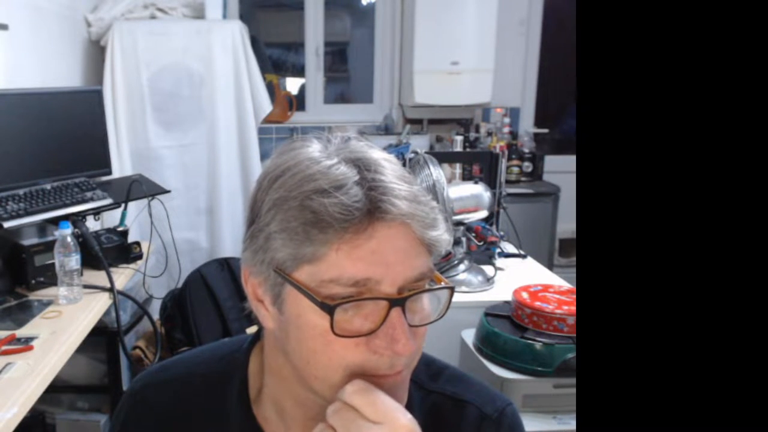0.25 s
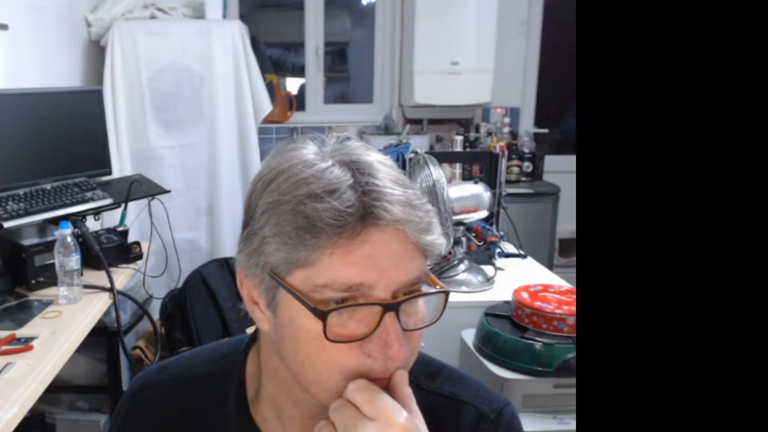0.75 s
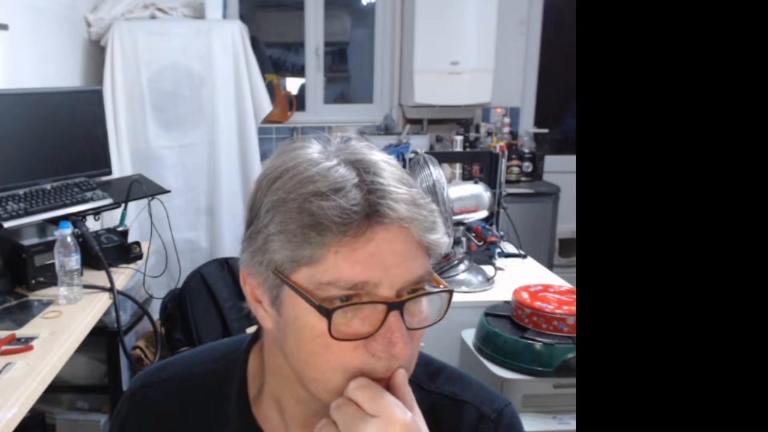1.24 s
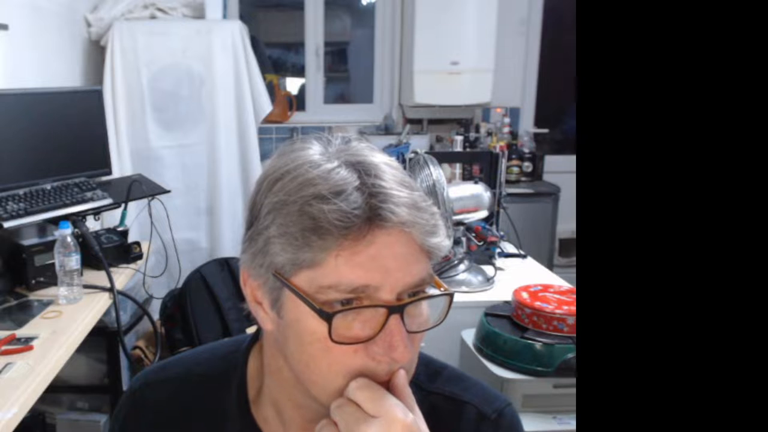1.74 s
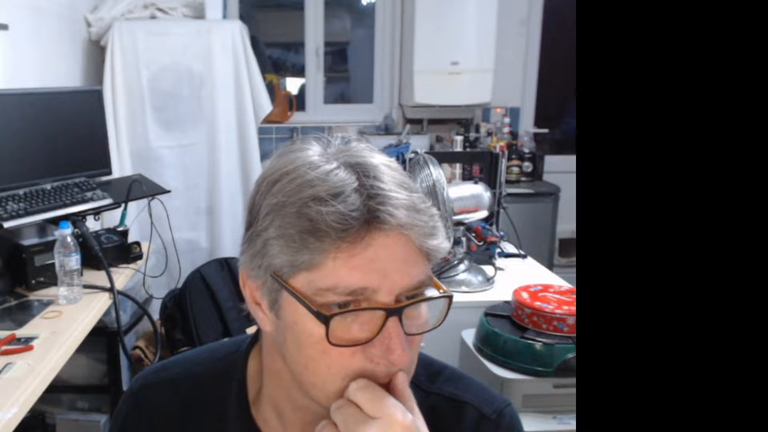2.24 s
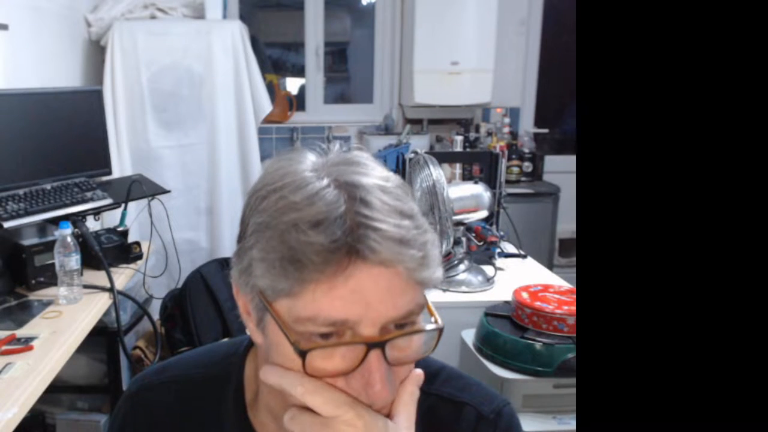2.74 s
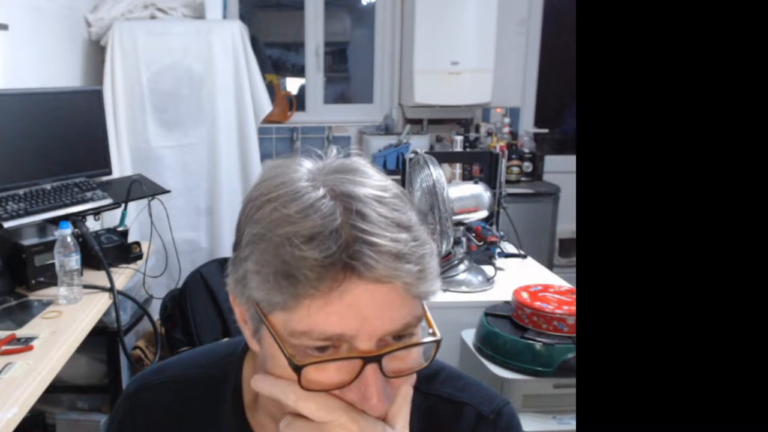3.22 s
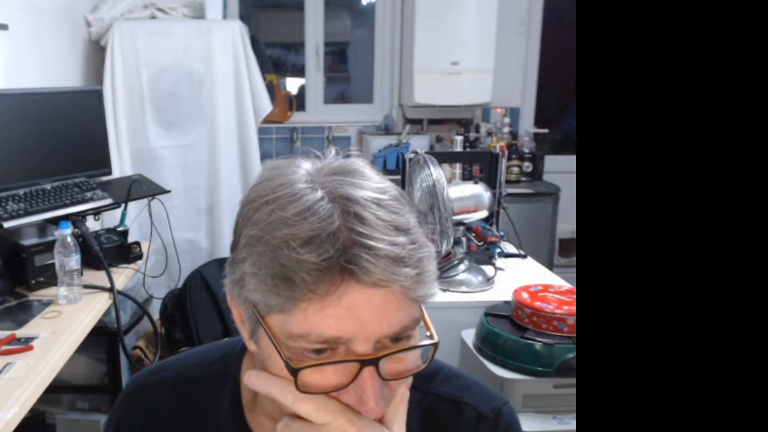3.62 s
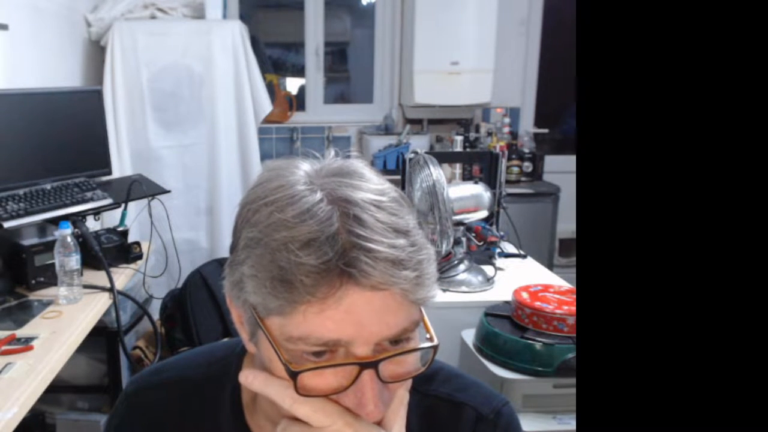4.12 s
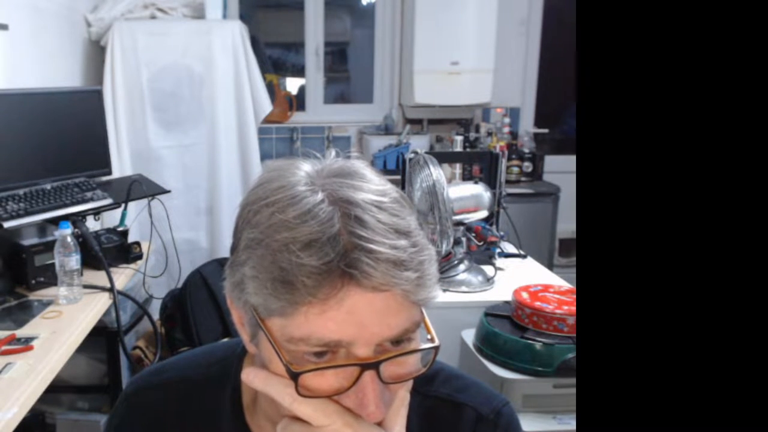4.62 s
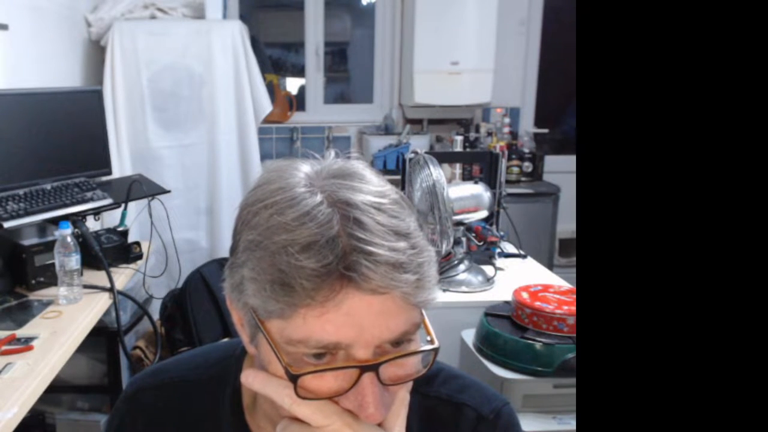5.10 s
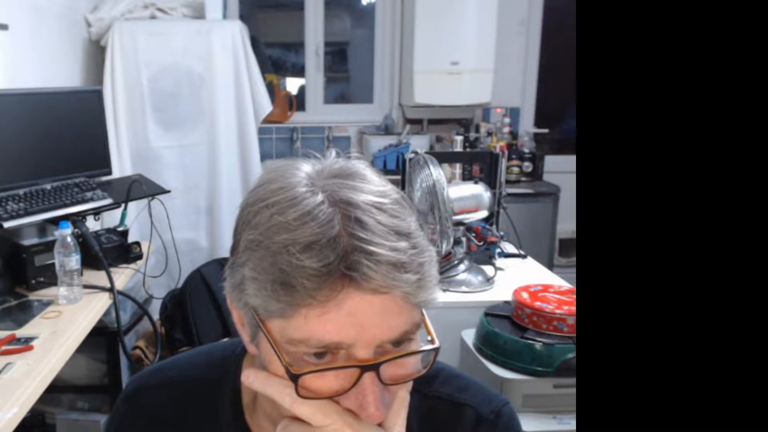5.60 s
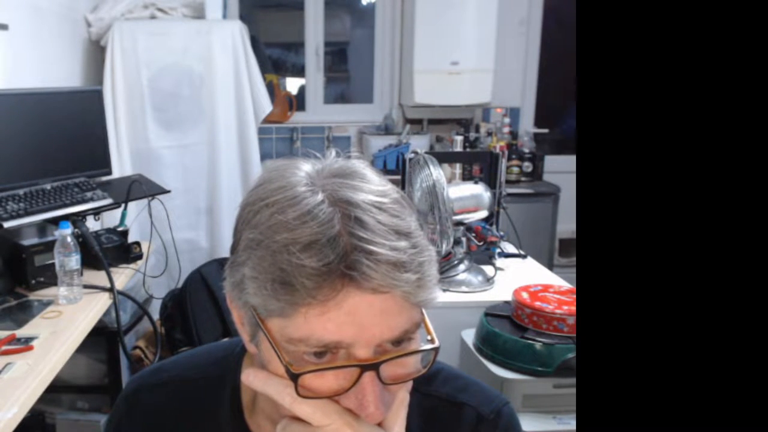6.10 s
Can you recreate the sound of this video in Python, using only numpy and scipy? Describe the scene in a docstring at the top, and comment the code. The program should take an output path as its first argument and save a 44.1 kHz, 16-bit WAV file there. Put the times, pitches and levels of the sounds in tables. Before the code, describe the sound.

In a small, dry workroom a desk fan runs throughout, a low beating throb under a rush of air, with two small fans whining beside it. A quick double knock hits the desk at the start; later come two tiny mouse clicks, a soft thud, one hard rattling knock, and two fainter clicks. A narrow-band desk microphone dips the fans after each hard knock.

```python
"""A desk fan runs throughout in a small workroom: a low beating blade throb and a rush of air through its guard.
Beside it two small fast fans, probably a computer's, whine in shaft-locked tones, each with one slow rise in speed.
Early on an object is knocked on the desk twice; a mouse then clicks, a soft and a hard knock follow,
and the mouse clicks again. Knocks are ringing modes plus rattle; clicks are a noise snap plus a ring.
A narrow-band desk microphone hears it all, and its limiter ducks the fans after each hard knock."""
import sys
import numpy as np
from scipy import signal
from scipy.fft import rfft, irfft
from scipy.io import wavfile
from scipy.ndimage import uniform_filter1d, minimum_filter1d

SR = 44100
rng = np.random.default_rng(int(sys.argv[2]) if len(sys.argv) > 2 else 0)


def file_out(sig):
    """Save sig as 16-bit WAV at sys.argv[1]."""
    # one column per channel
    cols = np.atleast_2d(sig).T
    # limit, then scale
    lim = np.clip(cols, -1, 1)
    pcm = np.round(lim * 32767).astype(np.int16)
    wavfile.write(sys.argv[1], SR, pcm)


N = 280035
ROOM_T60 = 0.21  # s, decay of the room behind knocks and clicks


def undb(db):
    """Decibels to gain."""
    return 10 ** (np.asarray(db) / 20)


def colour(x, points, lifts=()):
    """Shape a sound by a smooth spectrum plus bell-shaped resonances."""
    hz = np.maximum(np.fft.rfftfreq(len(x), 1 / SR), 1)
    point_hz, point_db = np.transpose(points)
    curve_db = np.interp(np.log(hz), np.log(point_hz), point_db)
    for centre_hz, width_hz, lift_db in lifts:
        curve_db = curve_db + lift_db / (1 + (2 * (hz - centre_hz) / width_hz) ** 4)
    return irfft(rfft(x) * undb(curve_db), len(x))


def butter(x, hz, kind, order):
    """Causal low-pass or high-pass, its corner held to a third of the sample rate at most."""
    sos = signal.butter(order, min(hz, SR / 3), kind, fs=SR, output="sos")
    return signal.sosfilt(sos, x)


def walk(rate_hz):
    """Slow random wander: levels held 1 / rate_hz seconds, slewed twice, scaled to a spread of 1."""
    hold = int(SR / rate_hz)
    steps = np.repeat(rng.standard_normal(N // hold + 1), hold)
    smooth = uniform_filter1d(uniform_filter1d(steps, hold), hold)[:N]
    return smooth / smooth.std()


def fade(t, t60):
    """Decay by 60 dB in t60 seconds."""
    return np.exp(-np.log(1000) * t / t60)


def tone(turns, db):
    """A sine of the given rms level that starts anywhere in its cycle."""
    return np.sqrt(2) * undb(db) * np.sin(2 * np.pi * (turns + rng.random()))


def add(out, start_s, sound, peak_db):
    """Place a sound at a time with a given peak level."""
    start = int(start_s * SR)
    levelled = undb(peak_db) * sound / np.abs(sound).max()
    out[start:start + len(sound)] += levelled[:N - start]


def desk_fan(swell_db=0.27, chop=0.027):
    """Blades throb; the air they drive rushes through the guard and pulses a little with each blade."""
    # two beating blade tones, then the motor's rotor and mains hum: pitch_hz [Hz], level_db [dB rms]
    hum_tones = [(38.1, -54), (40.9, -60.5), (97.8, -72), (100, -69)]
    # spectrum of the rush of air: pitch_hz [Hz], density_db [dB per Hz]
    air_spectrum = [(36, -78), (65, -84), (110, -82), (280, -87.5), (500, -88), (1050, -86), (1900, -82),
                    (2900, -90.5), (4400, -100.5), (5800, -105), (6600, -105), (7100, -117), (7700, -123)]
    # guard and housing resonances colouring the rush: centre_hz [Hz], width_hz [Hz], lift_db [dB]
    guard_resonances = [(151, 20, 2.5), (226, 22, 5.5), (414, 100, 4), (561, 67, 4), (752, 102, 8),
                        (877, 60, 8.5), (1227, 100, 4), (1610, 70, 2.5), (2800, 100, -0.5), (3585, 740, 2),
                        (5020, 570, 3.5), (6370, 670, 2)]
    t = np.arange(N) / SR
    hum = sum(tone(hz * t, db + 0.2 * walk(2)) for hz, db in hum_tones)
    # scaled so that the spectrum reads in dB per Hz
    white = rng.standard_normal(N) * np.sqrt(SR / 2)
    air = colour(white, air_spectrum, guard_resonances)
    blade_hz = hum_tones[0][0]
    blade_pulse = 1 + chop * np.sin(2 * np.pi * blade_hz * t)
    return hum + air * blade_pulse * undb(swell_db * walk(2))


def small_fan(fan, tones, level_db, flutter_db):
    """Tones locked to one shaft; uneven inflow makes each one flutter."""
    speed_hz, rise_hz, top_s, width_s = fan
    t = np.arange(N) / SR
    speed = speed_hz + rise_hz * np.exp(-((t - top_s) / width_s) ** 2)
    turns = np.cumsum(speed) / SR
    return sum(tone(multiple * turns, db + level_db + flutter_db * walk(9)) for multiple, db in tones)


def small_fans():
    """Two small fans whine side by side, each on its own shaft."""
    # shaft speed with one slow rise and fall: speed_hz [turns/s], rise_hz [turns/s],
    # top_s [s], width_s [s from the top to 1/e of the rise]
    fan_a = (76.3, 0.72, 4.15, 1.0)
    fan_b = (79.27, 0.78, 3.05, 1.0)
    # shaft tones: multiple [times the speed], level_db [dB rms before the fan's own level]
    tones_a = [(1, -73), (2, -75.5), (3, -60), (4, -60), (5, -54), (6, -63.5), (7, -73.5), (8, -66.5),
               (9, -84.5), (10, -64.5), (12, -58.5), (16, -78.5), (24, -71.5), (26, -67.5)]
    tones_b = [(1, -66.5), (3, -71.5), (4, -70), (5, -58), (6, -72.5), (7, -72), (8, -69), (10, -69.5),
               (11, -64.5)]
    whine_a = small_fan(fan_a, tones_a, level_db=0, flutter_db=1.17)
    whine_b = small_fan(fan_b, tones_b, level_db=-1, flutter_db=1.5)
    return whine_a + whine_b


def ring_modes(t, table):
    """Decaying sines, neighbours in opposite sign."""
    out = np.zeros(len(t))
    for k, (hz, db, t60) in enumerate(table):
        out += (-1) ** k * undb(db) * fade(t, t60) * np.sin(2 * np.pi * hz * t)
    return out


def grain(points, size):
    """Coloured noise of rms 1."""
    x = colour(rng.standard_normal(size), points)
    return x / x.std()


def contact(bright_hz, rattle_db, weight_db):
    """One sharp push rings desk and object, rattles briefly and dies away in the room."""
    # modes of the knocked object: pitch_hz [Hz], level_db [dB], t60_s [s]
    object_modes = [(670, -2.5, 0.047), (725, -0.5, 0.035), (1030, -2, 0.04), (1120, -18.5, 0.017),
                    (1270, -20, 0.17), (1514, -1.5, 0.033), (1773, -17.5, 0.13), (2330, -15, 0.095),
                    (2388, -10, 0.062), (2993, -6, 0.075), (3580, 4.5, 0.015), (4900, -5, 0.0061)]
    # low modes of the desk top: pitch_hz [Hz], level_db [dB before the weight], t60_s [s]
    desk_modes = [(144, -4, 0.094), (193.4, -18, 0.17), (256.3, -4.5, 0.073), (318.3, -9.5, 0.12)]
    # colour of the dense short rattle: pitch_hz [Hz], level_db [dB, relative]
    rattle_colour = [(90, -24.5), (250, -8), (480, -10), (900, 7.5), (1500, 7.5), (2000, 2.5), (3000, -5),
                     (3900, -0.5), (4700, 3), (5300, -6), (6300, -5), (7500, -18.5)]
    # colour of the room's answer: pitch_hz [Hz], level_db [dB, relative]
    room_colour = [(90, -20.5), (250, 3.5), (500, 2), (1000, 0.5), (2500, -1.5), (4500, -8), (7000, -17.5)]
    t = np.arange(SR // 2) / SR
    push = undb(10) * np.sin(2 * np.pi * 1000 * t) * fade(t, 0.0037)
    room_fade = undb(-14) * fade(t, ROOM_T60)
    ringing = ring_modes(t, object_modes) + undb(weight_db) * ring_modes(t, desk_modes)
    body = push + ringing + room_fade * grain(room_colour, len(t))
    # a short rattle with a faint tail in the room
    rattle_fade = undb(2) * fade(t, 0.028) + undb(-3) * room_fade
    rattle = rattle_fade * grain(rattle_colour, len(t))
    # a soft contact lasts longer, so it reaches only the low modes
    return butter(body, bright_hz, "low", order=2) + undb(rattle_db) * rattle


def settle(landing_db, flight_s, bounce_db, count):
    """Touch, landing and bounces of one knock, as (delay s, dB against the harder of touch and landing)."""
    landing_s = 0.0035  # one edge touches first, the object lands flat this much later
    flight_share = 0.9  # each flight lasts this share of the one before
    hardest_db = max(landing_db, 0)
    delays = landing_s + np.cumsum(flight_s * flight_share ** np.arange(count))
    bounces = [(delay, bounce_db * (k + 1)) for k, delay in enumerate(delays)]
    return [(0, -hardest_db), (landing_s, landing_db - hardest_db)] + bounces


def knocks():
    """The object touches the desk, lands flat and settles in ever softer bounces."""
    # knocks on the desk; level, brightness and rattle are those of a contact at full force:
    # start_s [s], peak_db [dB], bright_hz [Hz], rattle_db [dB], weight_db [dB on the desk top],
    # landing_db [dB against the touch], flight_s [s, first flight], bounce_db [dB per bounce]
    knock_list = [(0.099, 1, 1710, -3, -16, -5.5, 0.0089, -9.5),
                  (0.1435, 0, 1700, -11.5, -6.5, -10, 0.0132, -12.5),
                  (2.623, -33.5, 260, -37, 7, 6, 0.0072, -5.5),
                  (2.7620, 0, 3000, -0.5, 2.5, 14.5, 0.0056, -5)]
    # a weaker contact is duller and rattles less
    dulling_oct_per_db, rattle_db_per_db = 0.21, 0.77
    out = np.zeros(N)
    for start_s, peak_db, bright_hz, rattle_db, weight_db, landing_db, flight_s, bounce_db in knock_list:
        for delay_s, force_db in settle(landing_db, flight_s, bounce_db, count=4):
            contact_hz = bright_hz * 2 ** (dulling_oct_per_db * force_db)
            contact_rattle_db = rattle_db + rattle_db_per_db * force_db
            sound = contact(contact_hz, contact_rattle_db, weight_db)
            add(out, start_s + delay_s, sound, peak_db + force_db)
    # the knocks carry little below about 110 Hz
    return butter(out, 110, "high", order=3)


def mouse(snap_t60=0.018, ring_db=-6, ring_t60=0.024, room_db=-11):
    """A tiny spring snaps, rings for a moment and leaves a faint tail in the room."""
    # mouse button going down and up: start_s [s], peak_db [dB], ring_hz [Hz]
    button_moves = [(1.6790, -40, 5500), (1.7998, -40.5, 6130), (3.78, -44.5, 7500), (3.8944, -41.5, 7470)]
    t = np.arange(SR // 4) / SR
    out = np.zeros(N)
    for start_s, peak_db, ring_hz in button_moves:
        snap_fade = fade(t, snap_t60) + undb(room_db) * fade(t, ROOM_T60)
        snap = rng.standard_normal(len(t)) * snap_fade
        snap = butter(snap, 4400, "high", order=2)
        snap = butter(snap, 7500, "low", order=6)
        ring = undb(ring_db) * np.sin(2 * np.pi * ring_hz * t) * fade(t, ring_t60)
        add(out, start_s, snap + ring, peak_db)
    return out


def scene():
    """Three fans, the knocks and the mouse, in one channel."""
    return (desk_fan() + small_fans() + knocks() + mouse())[None]


def limiter(x, ceiling_db=-12, release_s=0.3):
    """Turns down just ahead of a peak and creeps back up."""
    over_db = np.maximum(20 * np.log10(np.abs(x) + 1e-9) - ceiling_db, 0)
    recovery = np.exp(-np.arange(N) / SR / release_s)
    # the cut in dB jumps to each new peak, then shrinks exponentially
    cut_db = np.maximum.accumulate(over_db / recovery) * recovery
    # 45 samples are about 1 ms: the cut starts early and is smoothed
    gain_db = uniform_filter1d(minimum_filter1d(-cut_db, size=45), size=45)
    return x * undb(gain_db)


def record(dry):
    """The microphone drops the deep bass and the top above about 7 kHz; a limiter guards the peaks."""
    x = butter(dry[0], 36.8, "high", order=7)
    x = butter(x, 7000, "low", order=14)
    # a steep last low-pass at 7900 Hz: 0.2 dB ripple, 70 dB rejection
    steep = signal.ellip(8, 0.2, 70, 7900, fs=SR, output="sos")
    return signal.sosfilt(steep, limiter(x))[None]


dry = scene()
out = record(dry)
file_out(out)
```